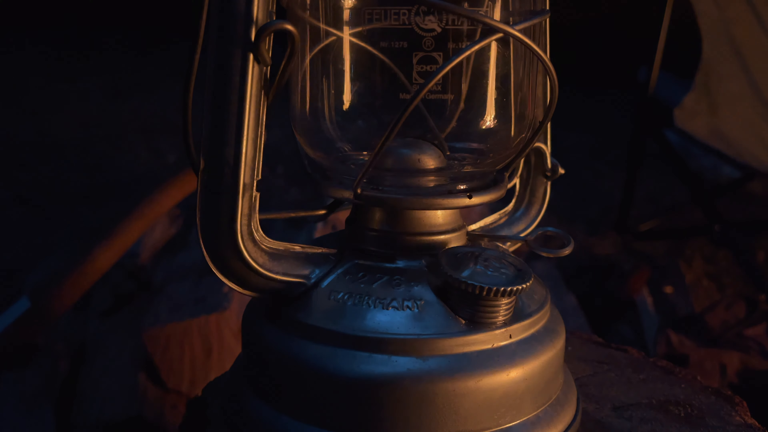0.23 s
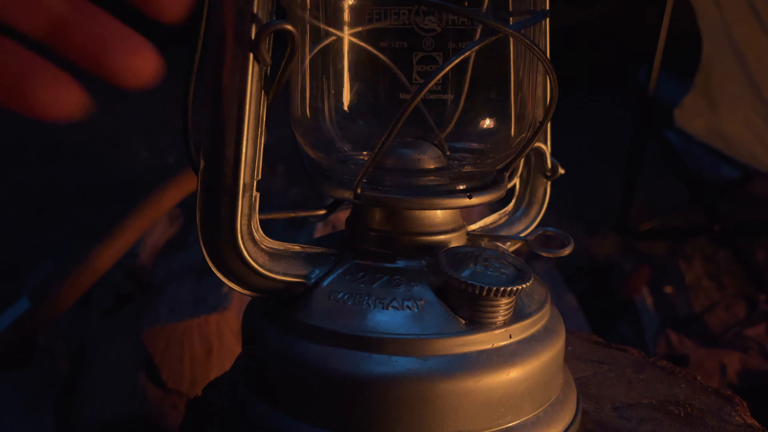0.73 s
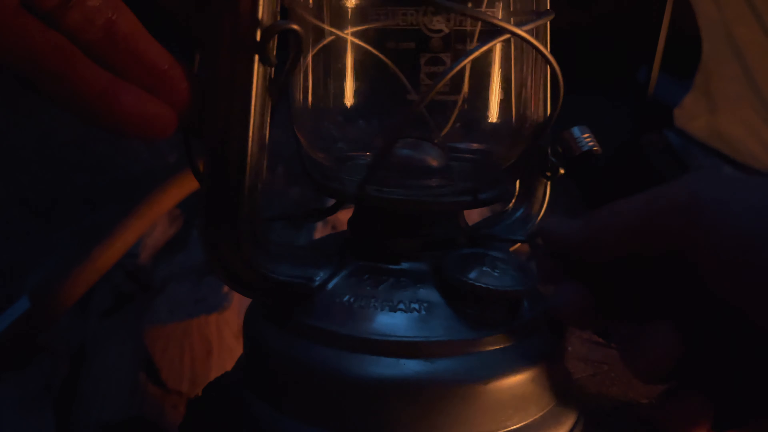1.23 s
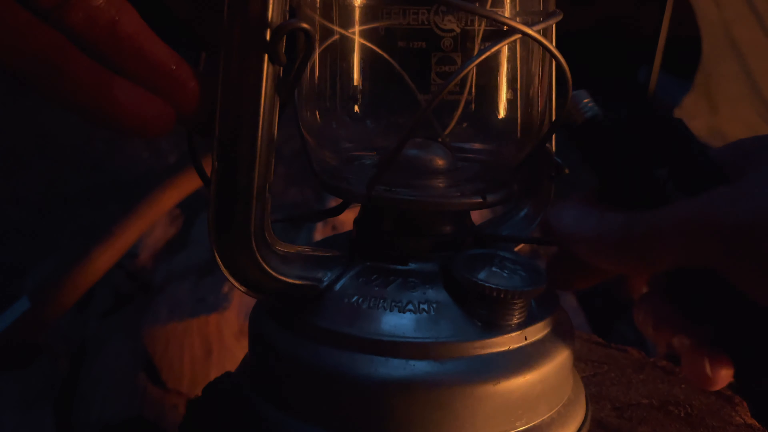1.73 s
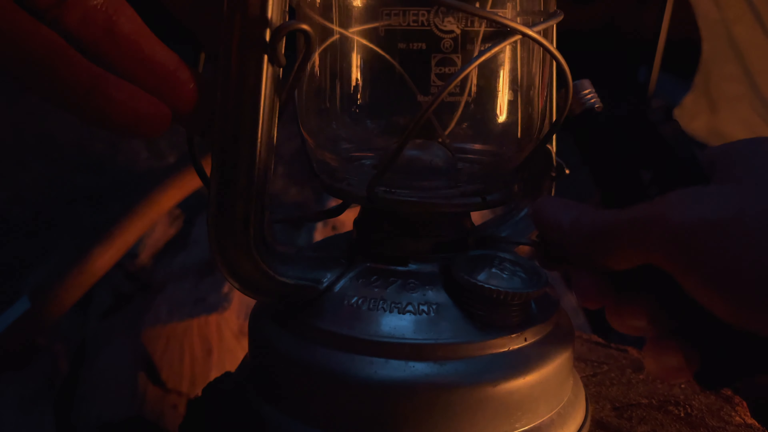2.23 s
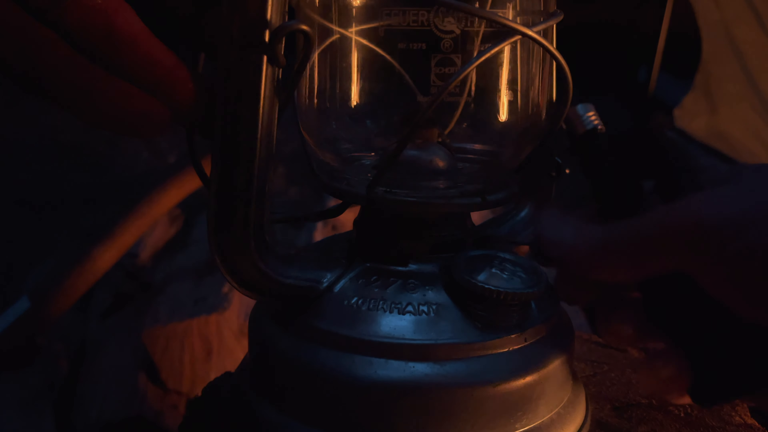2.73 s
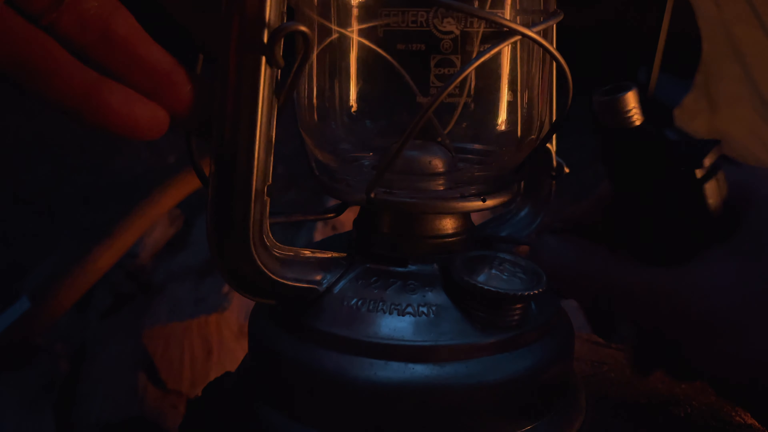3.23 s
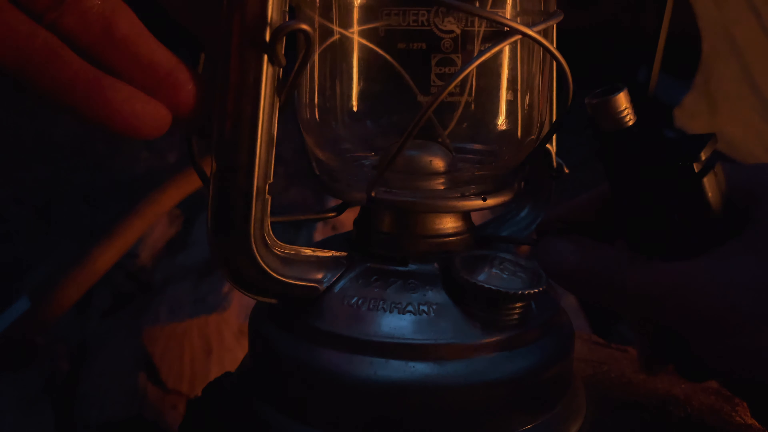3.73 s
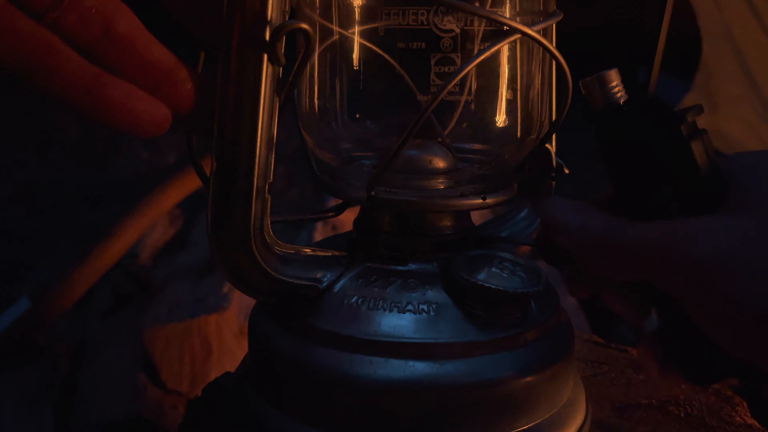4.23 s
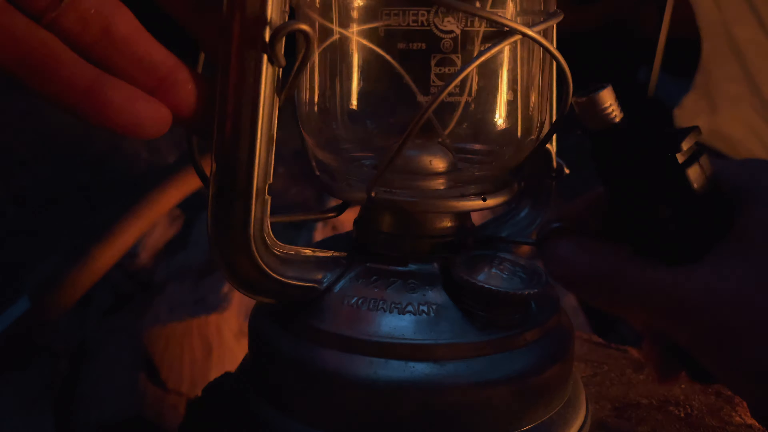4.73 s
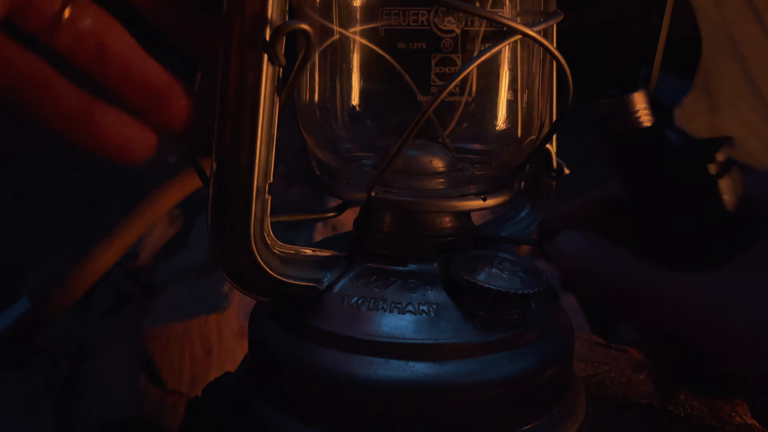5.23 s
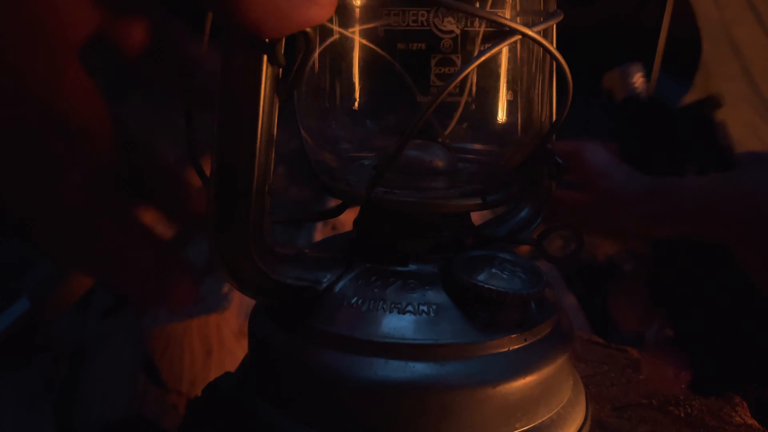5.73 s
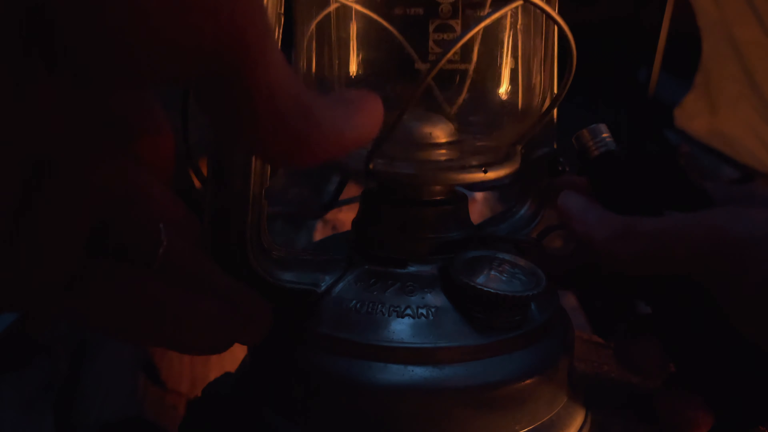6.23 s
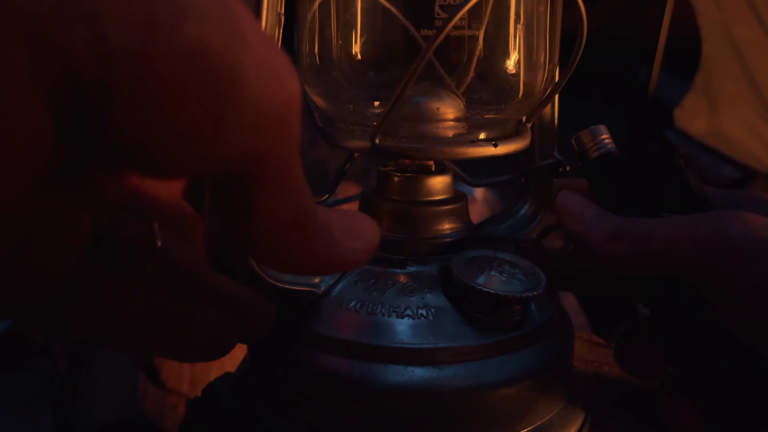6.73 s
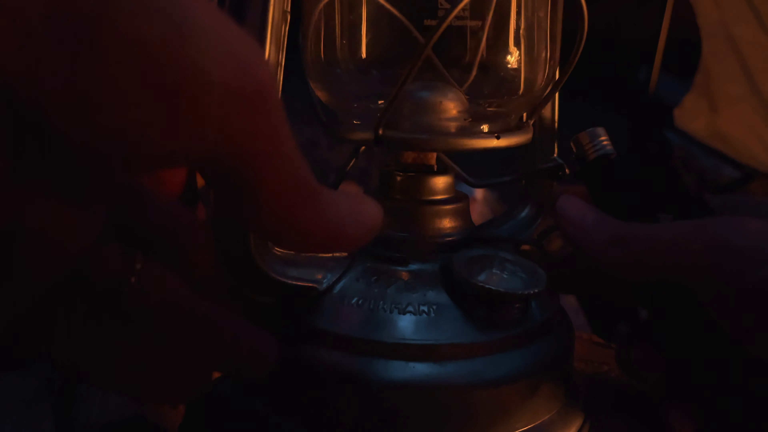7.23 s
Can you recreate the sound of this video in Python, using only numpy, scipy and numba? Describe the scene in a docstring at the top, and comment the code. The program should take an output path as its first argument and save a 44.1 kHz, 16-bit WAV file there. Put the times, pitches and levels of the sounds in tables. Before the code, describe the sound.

Close stereo at a quiet camp. Dry creaks and a brief crunch come from the right, with a swell of sleeve rustle. Then a hollow tin lantern is scraped and tapped on rough wood, its tank and thin parts ringing shortly, with tiny lever squeaks and wire handle jingle. A pause, more clusters of clinks, one hard click near six seconds, lighter taps, then cloth swells at the end over low rumble.

```python
"""Close stereo scene at a camp: hands shift a tin lantern on a rough log and work its lever.
0-0.6 s: dry creaks, then a crunch, on the right: filtered noise bursts and dense clicks.
From 0.95 s: grit scrapes and taps drive the hollow tank's modes; the bare contact is heard too.
1.3-4 s: the lever squeaks now and then, as gliding tones with overtones.
Throughout: patchy noise for a low rumble and for sleeves, swelling at 0.6-1 s and again at the end."""
import sys
import numpy as np
from scipy import signal
from scipy.fft import rfft, irfft
from scipy.io import wavfile
from scipy.ndimage import uniform_filter1d
from numba import njit

SR = 44100
rng = np.random.default_rng(int(sys.argv[2]) if len(sys.argv) > 2 else 0)


def output_pcm(signal):
    """Save a mono or channel-first signal as 16-bit PCM at the path in sys.argv[1].

    Samples are clipped to [-1, 1] before scaling.
    """
    pcm = np.clip(np.atleast_2d(signal).T, -1, 1) * 32767
    wavfile.write(sys.argv[1], SR, np.round(pcm).astype(np.int16))


N = 329868

# low rumble: (t/s, level/dB); its spectrum: (f/Hz, level/dB)
RUMBLE_LEVEL = [(0, -47), (1.15, -45.5), (2.0, -48.5), (4.0, -46), (4.4, -46.5), (5.9, -46.5), (6.7, -48.5),
                (7.48, -46)]
RUMBLE_SPECTRUM = [(12, -57.5), (20, -19), (40, -9), (70, -0.5), (236, -16.5), (315, -22), (440, -25.5),
                   (654, -27), (698, -42.5), (900, -46.5), (1170, -63.5), (1980, -120)]
# sleeves: (t/s, hiss level/dB, body level/dB), before the layer gains
RUSTLE_LEVELS = [(0, -60, -56.5), (.45, -56.5, -50.5), (.58, -57.5, -48.5), (.66, -48.5, -46),
                 (.9, -50.5, -45), (1.03, -55.5, -49), (1.2, -61, -56), (1.68, -62, -58),
                 (1.84, -67.5, -71), (2.45, -65.5, -62.5), (2.61, -62, -54.5), (3.13, -66, -63.5),
                 (3.35, -65.5, -65), (3.42, -61.5, -51.5), (3.6, -65.5, -65.5), (3.78, -63.5, -56.5),
                 (4.5, -68, -61.5), (5.05, -68, -69), (5.13, -58, -52), (5.33, -65, -61.5),
                 (5.66, -62.5, -59.5), (5.88, -65, -66), (6.65, -69, -71), (6.97, -64.5, -63.5),
                 (7.2, -65.5, -62.5), (7.33, -65, -59.5), (7.48, -53.5, -43)]
# bright and soft cloth spectra: (f/Hz, level/dB)
HISS_SPECTRUM = [(3000, -16), (4200, -4), (5800, -1), (7500, -3.5), (9500, -0.5), (11000, 1),
                 (12000, -12.5), (12800, -36.5)]
BODY_SPECTRUM = [(200, -6.5), (500, -1.5), (1500, -4), (3000, -5.5), (4000, -15), (6000, -55)]
# left-right likeness of rumble and rustle: (f/Hz, share 0-1)
LIKENESS = [(60, 0.99), (250, 0.73), (800, 0.1), (6500, 0.46), (8500, 0.3), (10000, 0.98)]
# dry slips: (t/s, level/dB before the band gains, share of the low end 0-1)
CREAK_SLIPS = [(.01, -29, 0.57), (0.12, -33.5, 0.53), (.128, -43, 1), (.157, -45, .1), (0.172, -35, 0.45),
               (0.192, -37, .3), (.201, -42, 0.5), (.216, -32.5, 0.65), (0.24, -39, 0.27),
               (.261, -33.5, 0.48), (.278, -36.5, 0.7), (0.301, -34, 0.47), (.315, -24.5, 0.45),
               (0.338, -35, 0.5)]
# crunch: (t/s, level/dB); its spectrum: (f/Hz, level/dB)
CRUNCH_LEVEL = [(0.42, -54), (0.434, -41.5), (0.494, -23), (0.548, -24.5), (0.558, -49), (0.58, -55)]
CRUNCH_SPECTRUM = [(60, -5), (130, -3.5), (550, 4.5), (760, -6), (1050, 1), (1500, -16), (2300, -14),
                   (3000, -27), (4300, -29.5), (5000, -29), (11000, -36)]
# hands: (t/s, damping factor of boom and knock, their pitch factor, damping factor of thin tin,
# wire handle level/dB, knock over the contact level/dB)
HAND_GRIP = [(1, 4.9, 1.08, 9, -19, -13), (1.3, 0.36, 0.96, 0.83, -17, -18),
             (1.35, 0.44, 0.98, 0.92, -8, -15), (1.39, 3, 1, 3.5, -2, -4), (1.5, 1.8, 1.01, 12, -4, -2),
             (1.87, 2.9, 1.047, 1.4, -22.5, -19.5), (2.03, 1.9, 1.04, 1.5, -9, -12),
             (2.08, 1.5, 1.044, 0.73, -7, -6), (2.2, 1.9, 1.034, 1.4, -8, -7),
             (2.33, 1.27, .98, 1.9, -4, -17), (2.45, 0.95, 1.02, 1.6, -1, -12),
             (2.9, 1.08, 0.98, 1.67, 0.5, -28), (3.899, 2.7, 1.007, 2.6, -14, -3.5),
             (4.35, 0.9, 1.026, 1.67, -15, -21.5), (4.7, 3, .98, 2.4, -0.5, -15),
             (4.86, 0.76, 1.01, 2.1, -21, -14), (4.92, 2.2, 0.995, 2.1, -8, -13.5),
             (5.8, 2.5, 0.99, 1.66, 5, -20.5), (5.97, 3.2, 1.06, 1.5, 2, -8),
             (6.2, 0.57, 1.077, 2.9, -2, -0.5), (6.5, 5.2, 1.07, 2.2, 0, -4.5),
             (7.4, 2.6, 0.93, 2.7, -5.5, 3)]
# scrape strokes: (start t/s, rise/s, hold/s, fall/s, grit level/dB,
# then over the grit: hollow boom level/dB, wall level/dB, thin tin level/dB)
SCRAPE_STROKES = [(0.953, .01, 0.028, .02, -74.5, 24.5, 1.5, 0),
                  (1.064, 0.0029, 0.0013, 0.039, -42.5, 3, -6, 7),
                  (1.09, .02, 0.11, .02, -74, 20.5, -9, -9),
                  (1.232, 0.049, 0.07, 0.042, -33, 8.5, 2.5, 4.5),
                  (1.483, 0.0071, 0.062, 0.049, -53, 10.5, -5, -0.5),
                  (1.857, 0.029, 0.0077, 0.019, -22.5, -4.5, -8, -0.5),
                  (1.91, 0.0023, 0.047, 0.027, -35, 0.5, -9, 4),
                  (1.971, 0.0033, 0.013, 0.047, -27.5, -4, -13, -0.5),
                  (2.001, 0.0091, 0.019, 0.048, -43, 4.5, -1, 10), (2.029, .01, .018, .008, -73, 9, 37, -2),
                  (2.154, .038, 0.0025, 0.042, -26, -4.5, -10, 3.5),
                  (2.215, 0.0043, 0.037, 0.036, -48, 16, 13.5, 9.5),
                  (2.276, 0.03, 0.029, 0.052, -34.5, 9, -4.5, 7),
                  (2.782, .025, 0.015, 0.049, -33, 1, -6.5, -2),
                  (2.865, .01, 0.18, 0.025, -72.5, 34, 17, 8),
                  (2.93, 0.016, 0.018, 0.013, -59.5, 22, 14, 15),
                  (2.954, 0.038, 0.041, 0.047, -31, -7.5, -4.5, -3.5),
                  (3.787, 0.0044, 0.11, 0.03, -66, 9.5, 10, 5),
                  (3.977, .003, .002, 0.092, -44, 4, -23, -4.5),
                  (4.086, 0.011, 0.0089, 0.033, -48.5, 6.5, 0, -10),
                  (4.123, 0.0081, 0.018, .04, -56, 13, -8, -10),
                  (4.207, .034, 0.059, 0.049, -36.5, 9, -1, 4.5),
                  (4.414, 0.0017, .002, 0.043, -50, 14, 1, 7),
                  (4.668, 0.016, .002, 0.033, -34, -1, -11.5, -9),
                  (4.717, 0.0041, 0.0056, 0.032, -29.5, -13, -9.5, -9.5),
                  (4.736, 0.0091, .04, 0.09, -54, 4, -7, -2), (4.82, 0.016, .03, 0.0374, -52, 20, 10.5, -3),
                  (5.675, 0.0054, 0.061, .05, -63, 14.5, 1, -9.5),
                  (5.893, 0.046, 0.017, .005, -49, -20, -16, -7),
                  (5.963, .003, 0.018, 0.26, -45.5, 4, -15, -11.5),
                  (6.101, .003, 0.063, 0.077, -45, 4.5, -11, -13.5),
                  (6.195, 0.025, 0.0023, 0.068, -48, -4, -11, -17),
                  (6.263, 0.0065, 0.0026, 0.15, -53.5, 3.5, -13.5, -13),
                  (6.36, 0.0092, .002, 0.073, -51, -2, -7.5, -19),
                  (6.419, 0.025, .002, 0.044, -51.5, 2, -16, -14),
                  (6.466, 0.022, 0.029, 0.081, -38.5, -9.5, -12.5, -12.5),
                  (6.806, 0.029, .002, 0.096, -53.5, 9.5, -11, -12.5),
                  (6.904, 0.021, .002, .025, -56, -22.5, -15.5, -14)]
# taps: (t/s, tick level/dB, then over the tick: boom level/dB, thin tin level/dB; tick t60/s)
TAP_EVENTS = [(1.068, -35, -11, -1, 0.024), (1.2357, -44, 17, 7.5, 0.027), (1.2625, -35.5, 17, 1, 0.019),
              (1.4171, -33.5, -20, -13, .023), (1.4865, -34, 11, 4.5, 0.021), (1.516, -33.5, 8, 1, 0.029),
              (1.5491, -32, -15, -30.5, 0.091), (1.838, -53.5, 14, -2, 0.056), (1.865, -40, 4, 6.5, .025),
              (1.9245, -17.5, -8, -6, 0.094), (1.955, -17.5, -20, -2, 0.026), (1.9776, -9.5, -7, -11, .019),
              (2.039, -32, -2.5, -1.5, .02), (2.1605, -20.5, -4, 2.5, 0.017),
              (2.1744, -23.5, -19.5, 8, 0.021), (2.185, -23, 1.5, -5.5, .027), (2.281, -40, 11, 7.5, 0.04),
              (2.2911, -33.5, 7.5, 9.5, 0.025), (2.8, -26, -7, -4, 0.051), (3.1603, -51, -25, -12, 0.05),
              (3.242, -59, 11.5, -13, 0.027), (3.3088, -50.5, 4.5, -11.5, 0.067),
              (3.7963, -35.5, 10, 0, 0.031), (3.8145, -43, 8.5, -1, 0.077), (3.9765, -26, -1, -4.5, 0.025),
              (4.0567, -59, 24, 5, 0.026), (4.0959, -39, 7.5, -15, 0.046), (4.136, -26.5, 0.5, -10, 0.042),
              (4.145, -29, -5, -15.5, 0.063), (4.2123, -34.5, -2, -4, 0.068), (4.4184, -32, 5, 2, 0.038),
              (4.6211, -30.5, -14.5, -25, .016), (4.6719, -45, -5.5, 4, 0.042),
              (4.6815, -18.5, -13, -7.5, 0.031), (4.688, -31, -6.5, -14, .022),
              (4.7219, -15.5, -28.5, -26, 0.018), (4.7327, -23.5, -10.5, -24, 0.028),
              (5.0662, -47.5, 1, -11, .032), (5.7182, -37, -11.5, -13, 0.036),
              (5.904, -41.5, 4.5, -18, 0.051), (5.9331, -26, -1.5, -10.5, 0.024),
              (5.96, -7, -10.5, -26, 0.033), (6.097, -14, -33, -27, 0.036), (6.1427, -34.5, -14, -18, .054),
              (6.192, -39, -11, -22, .03), (6.2237, -37, 1.5, -24.5, 0.033),
              (6.2726, -39.5, .5, -33.5, 0.045), (6.3752, -42.5, -10.5, -22.5, .043),
              (6.4945, -25.5, -4, -21.5, 0.06), (6.506, -23, -11, -17, 0.053), (6.556, -35, -7, -33, .03),
              (6.7835, -45, -9, -20.5, 0.04), (6.824, -44, 2, -18.5, 0.11),
              (6.971, -46.5, -34, -16.5, 0.023), (7.011, -46, 0, -6, 0.081),
              (7.0839, -46.5, -8.5, -15.5, .03), (7.1056, -43, 2, -14.5, 0.037), (7.1941, -47, 0, -16, .04),
              (7.4042, -45.5, 5, -6, 0.029)]
# gain of tap force on knock, boom, wall, rim, cap, frame: (level/dB)
TAP_GAINS_DB = [-3.5, .5, -3.5, 1, 1, -5.5]
# share of the grit's dB swing followed by knock, boom, wall, rim, cap: (share), rising and fading
RISE_SHARES = [1, .35, 0.31, 0.64, 0.88]
FADE_SHARES = [0.88, 0.82, 0.51, 0.99, .9]
# cap over rim as the contact wanders: (t/s, level/dB)
CAP_BALANCE = [(1.07, -3), (1.3, -1.5), (1.55, -6), (1.9, -4.5), (2.2, -5), (2.35, -7.5), (2.82, -4.5),
               (2.96, 2.5), (3.8, -3), (4.3, .5), (4.7, -1.5), (6.0, -0.5), (7.2, -4)]
# base on wood and tank boom: (f/Hz, level/dB, t60/s), f and t60 before the hands' factors
LOG_MODES = [(380.2, -4.5, 0.56), (410, -7.5, 0.017), (465.7, 1, .07), (591.7, -5.5, 0.073)]
BOOM_MODES = [(625, -7, 0.073), (663.3, 3.5, 0.19), (718, -6.5, 0.26), (777.5, -11, 0.0356)]
# tank wall and thin tin parts: (f/Hz, level/dB, t60/s), t60 before the hands' factor
WALL_MODES = [(1108, -9.5, 0.049), (1209, -4, .27), (1260, -9, 0.12), (1396, -11, 0.04)]
RIM_MODES = [(1553, -14.5, 0.12), (1630, -12, .25), (1670, -10, 0.057), (1840, -9, .07), (2052, -6, .06),
             (2130, -14, 0.19), (2190, 0.5, 0.051)]
CAP_MODES = [(2380, 0.5, 0.063), (2540, -11.5, .13), (2632, -6.5, 0.23), (2757, 1, 0.071),
             (3084, -5, 0.044), (3160, -12.5, 0.04), (3570, -5.5, .035)]
FRAME_MODES = [(4250, -25.5, .06), (5330, -11.5, .05), (5990, -4.5, 0.053), (6790, -3.5, 0.1),
               (7160, -3, .06), (7530, 3, .04), (8970, 0, .05), (9220, 2.5, 0.032)]
# bare scrape, bare tap and wire handle spectra: (f/Hz, level/dB)
GRIT_SPECTRUM = [(250, -35.5), (900, -13.5), (3000, -4.5), (4500, -1), (7000, 0), (9000, 6.5),
                 (11000, 12.5), (12300, -4.5), (13000, -8.5), (13600, -38)]
TICK_SPECTRUM = [(250, -36.5), (1500, -9.5), (4500, -2), (8000, -5), (11000, 8), (12500, -4), (14000, -2),
                 (15500, 2.5)]
WIRE_SPECTRUM = [(6000, -27.5), (7300, -3), (9000, 2), (11300, 1.5), (12500, 0), (13500, -10), (15500, -9)]
# unrung rim and cap spectra: (f/Hz, level/dB)
BARE_RIM_SPECTRUM = [(900, -31.5), (1500, -3.5), (2300, -2.0), (2700, -34)]
BARE_CAP_SPECTRUM = [(2000, -31.0), (2400, 1.5), (3900, -5.0), (4600, -17.0)]
# lever slips: (peak t/s, level/dB, f/Hz at the peak, glide/(share per s), rise to peak/s, fall/s);
# rise and fall are 1/e times
LEVER_SLIPS = [(1.285, -35, 2214, 0.082, 0.033, .03), (1.345, -23.5, 2220, .1, 0.041, 0.0047),
               (1.896, -13, 1830, 1.3, 0.0042, 0.0023), (1.991, -6.5, 2190, .3, 0.0059, 0.0013),
               (2.195, -18, 2242, 4.7, 0.018, 0.012), (2.83, -23, 2140, .3, 0.0074, 0.0027),
               (4.007, -41, 2190, 0.29, 0.0054, 0.0071)]
# multiples 1-5 of the squeak pitch: (level/dB)
SQUEAK_OVERTONES_DB = [0.5, -17.5, -18.5, -21.5, -14.5]
# lantern left over right: (f/Hz, level/dB)
LANTERN_TILT = [(300, 2), (1500, 1.5), (2200, 3.5), (6500, 4.5), (8000, 1.5), (16000, -2)]
# microphone response: (f/Hz, level/dB)
MIC_RESPONSE = [(20, -18), (45, -3), (11500, 0), (12500, -6.5), (13500, -24.5), (16000, -31)]
# phase lead of left channel over right: (f/Hz, phase/rad)
LEFT_LEAD = [(100, 0), (650, .45), (1300, .3), (2800, 1.1), (5000, 1), (6200, 0), (7800, .9), (8600, 0),
             (10200, -np.pi), (11900, -2 * np.pi), (12400, -2 * np.pi), (13700, -3 * np.pi),
             (15500, -4 * np.pi)]

ENDS_DB, SWELL_DB = -31.5, 3  # grit at both ends of a stroke, and its growth over the hold
KNOCK_LAG, SOFT_TAP_DB = .4, -35  # knock over tick falls KNOCK_LAG dB per dB of tick above SOFT_TAP_DB
EDGE_HZ = 16400


def amp(db):
    """Amplitude factor of a level in dB."""
    return 10 ** (np.asarray(db) / 20)


def evened(x):
    """Signal scaled to rms 1."""
    return x / np.sqrt(np.mean(x ** 2) + 1e-20)


def read(points, hz):
    """Table value at each frequency, linear over log frequency."""
    f_hz, value = np.transpose(points)
    return np.interp(np.log(hz + 1), np.log(f_hz + 1), value)


def add(mix, start_s, sound):
    """Adds a sound in place from start_s, cut at the end of the mix."""
    part = mix[..., round(start_s * SR):][..., :sound.shape[-1]]
    part += sound[..., :part.shape[-1]]


def curve(rows, column=1):
    """Amplitude over the scene from a dB column, linear in dB."""
    rows = np.vstack(rows)
    return amp(np.interp(np.arange(N) / SR, rows[:, 0], rows[:, column]))


def coloured(x, spectrum):
    """Minimum-phase filter of unit energy with the given spectrum."""
    log_gain = np.log(amp(read(spectrum, abs(np.fft.fftfreq(4096, 1 / SR)))))
    taps = np.fft.ifft(np.exp(np.conj(signal.hilbert(log_gain)))).real[:2048]
    return signal.oaconvolve(x, taps / np.linalg.norm(taps))[:N]


def grains(per_s, spread_db):
    """Random clicks of uneven size and sign, rms 1."""
    size = amp(spread_db * np.minimum(rng.exponential(1, N), 4))
    sign = rng.choice([-1., 1.], N)
    return evened(size * sign * (rng.random(N) < per_s / SR))


def air(spectrum, patchy_db, size):
    """Two-channel noise with patches drifting over time and frequency, rms 1."""
    hz = np.fft.rfftfreq(size, 1 / SR)
    a, b, c, d, patches = rng.standard_normal((N * 4 // size + 5, len(hz), 5)).T
    patches = evened(uniform_filter1d(uniform_filter1d(patches, 12, 0), 10, 1))
    alike = read(LIKENESS, hz)[:, None]
    left = a + 1j * b
    right = alike * left + np.sqrt(1 - alike ** 2) * (c + 1j * d)
    z = np.array([left, right]) * amp(read(spectrum, hz)[:, None] + patchy_db * patches)
    return evened(signal.istft(z, nperseg=size, noverlap=size * 3 // 4)[1][:, :N])


def rumble():
    """Low rumble: slow patchy noise with a steep low-pass spectrum."""
    return curve(RUMBLE_LEVEL) * air(RUMBLE_SPECTRUM, 2.1, size=4096)


def rustle():
    """Cloth friction: a bright hiss and a softer body, each patchy noise."""
    hiss = amp(4.0) * curve(RUSTLE_LEVELS) * air(HISS_SPECTRUM, 2.4, size=512)
    body = amp(-0.5) * curve(RUSTLE_LEVELS, column=2) * air(BODY_SPECTRUM, 1.8, size=512)
    return hiss + body


def creaks():
    """Single dry slips: noise whose treble dies faster than its low end."""
    out, t = np.zeros(N), np.arange(900) / SR
    high = signal.butter(4, [650, 2600], "band", fs=SR)
    low = signal.butter(4, [350, 1100], "band", fs=SR)
    for start_s, db, low_share in CREAK_SLIPS:
        noise = rng.standard_normal(len(t))
        snap = amp(15.5) * signal.lfilter(*high, noise * amp(-60 * t / 0.0074))
        thud = amp(19.5) * signal.lfilter(*low, noise * amp(-60 * t / 0.022))
        add(out, start_s, amp(db) * ((1 - low_share) * snap + low_share * thud))
    return out


def crunch():
    """Dense clicks of uneven size through one spectrum."""
    n = np.arange(N)
    inside = (n > CRUNCH_LEVEL[0][0] * SR) & (n < CRUNCH_LEVEL[-1][0] * SR)
    return coloured(grains(800, 1.4) * curve(CRUNCH_LEVEL) * inside, CRUNCH_SPECTRUM)


def creaking():
    """Creaks and crunch placed right: the left channel is weaker and 3 samples later."""
    out = creaks() + crunch()
    return np.array([amp(-4.5) * np.roll(out, 3), amp(0.5) * out])


def hands(column):
    """One grip setting over the scene, linear between table rows."""
    rows = np.array(HAND_GRIP)
    return np.interp(np.arange(N) / SR, rows[:, 0], rows[:, column])


def cap_over_rim_db(t_s):
    """Cap level over rim level at a time."""
    return np.interp(t_s, *np.transpose(CAP_BALANCE))


def grit_texture():
    """Fine grit over uneven teeth about 5 ms apart, each a decaying burst of clicks, rms 1."""
    wander_db = 4 * evened(uniform_filter1d(rng.standard_normal(N), 200))
    teeth = np.cumsum(210 * amp(wander_db)) / SR
    size = amp(4.5 * np.clip(rng.standard_normal(N), -2, 1.4))[teeth.astype(int)]
    bite = 0.6 + 1.3 * size * np.exp(-(teeth % 1) / 0.24)
    return evened(bite * grains(12000, 0.72))


def scraping():
    """Scrape force on log, boom, wall, rim, cap and frame: grit shaped by each stroke."""
    force, knock_db = np.zeros((6, N)), hands(column=5)
    rise_shares, fade_shares = np.c_[list(RISE_SHARES) + [1]], np.c_[list(FADE_SHARES) + [1]]
    for start_s, rise_s, hold_s, fall_s, grit_db, boom_db, wall_db, tin_db in SCRAPE_STROKES:
        corners_s = np.cumsum(np.maximum([0, rise_s, hold_s, fall_s], [0, .001, .001, .001]))
        t = np.arange(0, corners_s[-1], 1 / SR)
        swing_db = np.interp(t, corners_s, [ENDS_DB, -SWELL_DB / 2, SWELL_DB / 2, ENDS_DB])
        cap_db = tin_db + cap_over_rim_db(start_s)
        over_db = np.array([knock_db[round(start_s * SR)], boom_db, wall_db, tin_db, cap_db, 0])
        follow = np.where(t < rise_s, rise_shares, fade_shares)
        levels_db = grit_db + over_db[:, None] + swing_db * follow
        add(force, start_s, amp(levels_db) * signal.windows.tukey(len(t), .1))
    return force * grit_texture()


def tapping():
    """Tap force on the same six parts: a decaying noise burst, hardest at first touch."""
    force, t, knock_db = np.zeros((6, N)), np.arange(3000) / SR, hands(column=5)
    edge = 1 + 0.23 * np.exp(-t / 0.00035)
    for tap_s, tick_db, boom_db, tin_db, t60_s in TAP_EVENTS:
        log_db = knock_db[round(tap_s * SR)] - KNOCK_LAG * (tick_db - SOFT_TAP_DB)
        wall_db = (boom_db + tin_db) / 2
        cap_db = tin_db + cap_over_rim_db(tap_s)
        over_db = np.array([log_db, boom_db, wall_db, tin_db, cap_db, 0])
        levels_db = tick_db + over_db + np.array(TAP_GAINS_DB)
        noise = rng.standard_normal(len(t))
        burst = (0.61 * np.sign(noise) + 0.34 * noise) * edge
        add(force, tap_s - .0005, amp(levels_db[:, None] - 60 * t / t60_s) * burst)
    return force


@njit
def resonate(push, loss, turn, damping, pitch):
    """Two-pole resonance of gain 1 on noise; decay and pitch are renewed every 32 samples."""
    out, a, b, g = np.zeros(len(push)), 0., 0., 0.
    for n in range(2, len(push)):
        if n % 32 == 2:
            r, w = 1 - loss * damping[n], turn * pitch[n]
            a, b = 2 * r * np.cos(w), r * r
            g = 2 * np.sin(w) * np.sqrt(1 - r)
        out[n] = g * push[n] + a * out[n - 1] - b * out[n - 2]
    return out


def ring(drive, modes, low=False):
    """Hand-damped modes, each driven by the force times its own shift of one white noise."""
    if low:
        damping, pitch = hands(column=1), hands(column=2)
    else:
        damping, pitch = hands(column=3), np.ones(N)
    out, chance = np.zeros(N), rng.standard_normal(N)
    for k, (hz, db, t60_s) in enumerate(modes):
        push = amp(db) * drive * np.roll(chance, k * SR // 2)
        loss, turn = np.log(1000) / (t60_s * SR), 2 * np.pi * hz / SR  # per sample
        out += resonate(push, loss, turn, damping, pitch)
    return out / np.linalg.norm(amp([db for _, db, _ in modes]))


def rung_parts(force):
    """Knock on the log and the tank's parts, ringing under the contact force."""
    log, boom, wall, rim, cap, frame = force
    low = ring(log, LOG_MODES, low=True) + ring(boom, BOOM_MODES, low=True)
    tin = ring(wall, WALL_MODES) + amp(-2.0) * ring(rim, RIM_MODES)
    tin += amp(-1.5) * ring(cap, CAP_MODES) + amp(-8.5) * ring(frame, FRAME_MODES)
    return low + tin


def bare_contact(scrape, tap):
    """Contact noise without ringing: grit, ticks, rim, cap, and the wire handle jingling along."""
    rim, cap, frame = (scrape + tap)[3:]
    out = amp(0.5) * coloured(scrape[-1], GRIT_SPECTRUM) + coloured(tap[-1], TICK_SPECTRUM)
    out += amp(-11.0) * coloured(rim, BARE_RIM_SPECTRUM)
    out += amp(-5.5) * coloured(cap, BARE_CAP_SPECTRUM)
    jingle = amp(hands(column=4)) * frame * rng.standard_normal(N)
    return out + coloured(jingle, WIRE_SPECTRUM)


def squeaks():
    """Lever stick-slip: a gliding pitch with thin overtones that swells and stops."""
    out, t = np.zeros(N), np.arange(-2000, 2000) / SR
    for peak_s, db, hz, glide, rise_s, fall_s in LEVER_SLIPS:
        turns = hz * t * (1 + glide * t / 2)
        tone = np.zeros(len(t))
        for k, overtone_db in enumerate(SQUEAK_OVERTONES_DB):
            tone += amp(overtone_db) * np.sin(2 * np.pi * (k + 1) * turns + k)
        swell = np.exp(-(t / np.where(t < 0, rise_s, fall_s)) ** 2)
        add(out, peak_s + t[0], amp(db) * tone * swell)
    return out


def echoes(x):
    """Short echoes off log and ground, other for each ear; three patterns take turns 7 times a second."""
    t, turns = np.arange(1500) / SR, 7 * np.arange(N) / SR
    sparse = rng.standard_normal((3, 2, 1500)) * (rng.random((3, 2, 1500)) < .05)
    taps = sparse * amp(-60 * t / 0.044) * (t > .001)
    taps /= np.linalg.norm(taps, axis=2)[..., None]
    out = np.zeros((2, N))
    for k, pattern in enumerate(taps):
        window = np.sqrt(2 / 3) * np.cos(np.pi * (turns + k / 3))  # squares sum to 1
        out += signal.oaconvolve((x * window)[None], pattern, axes=1)[:, :N]
    return out


def lantern():
    """Ringing parts, bare contact and squeaks, with echoes and a left-right spectral tilt."""
    scrape, tap = scraping(), tapping()
    direct = rung_parts(scrape + tap) + bare_contact(scrape, tap) + squeaks()
    band = signal.butter(4, [1500, 7800], "band", fs=SR)
    both = direct + amp(-3.5) * echoes(signal.lfilter(*band, direct))
    half_tilt_db = read(LANTERN_TILT, np.fft.rfftfreq(N, 1 / SR)) / 2
    return irfft(rfft(both) * amp([half_tilt_db, -half_tilt_db]), N)


def scene():
    """Sum of all sources, from the background to the lantern."""
    return rumble() + rustle() + creaking() + lantern()


def record(dry):
    """Microphone response, phase difference between left and right channels, then the band limit."""
    hz = np.fft.rfftfreq(N, 1 / SR)
    right_lag = np.exp(-1j * np.interp(hz, *np.transpose(LEFT_LEAD)))
    phases = np.array([np.ones(len(hz)), right_lag])
    channels = irfft(rfft(dry) * amp(read(MIC_RESPONSE, hz)) * phases, N)
    band_limit = signal.firwin(511, EDGE_HZ, window=("kaiser", 9), fs=SR)
    return signal.oaconvolve(channels, band_limit[None], "same")


dry = scene()
out = record(dry)
output_pcm(out)
```